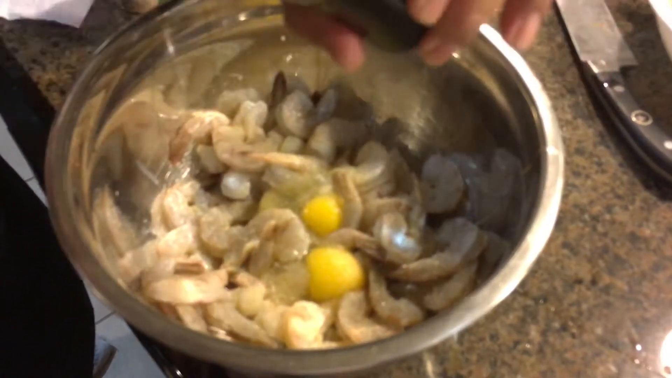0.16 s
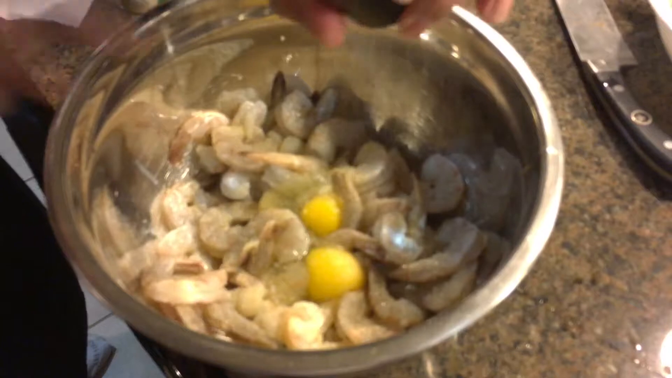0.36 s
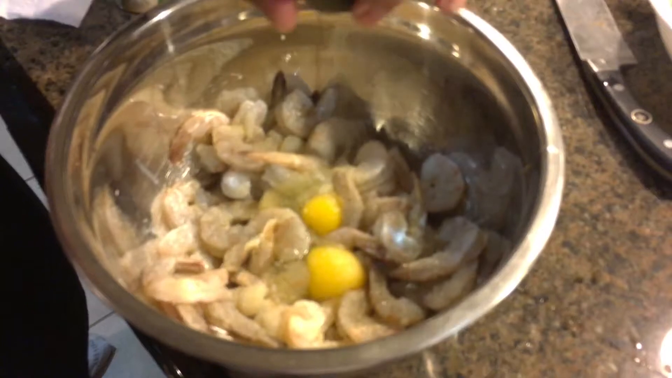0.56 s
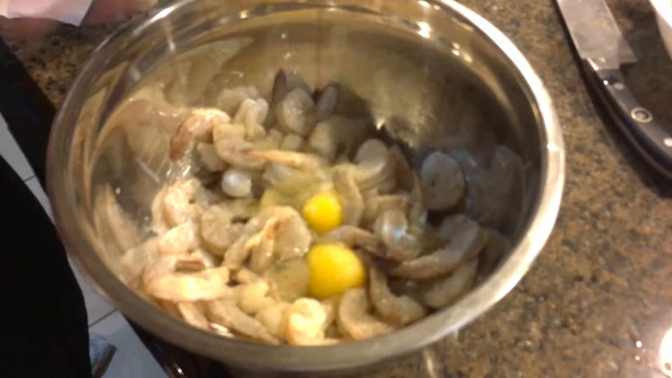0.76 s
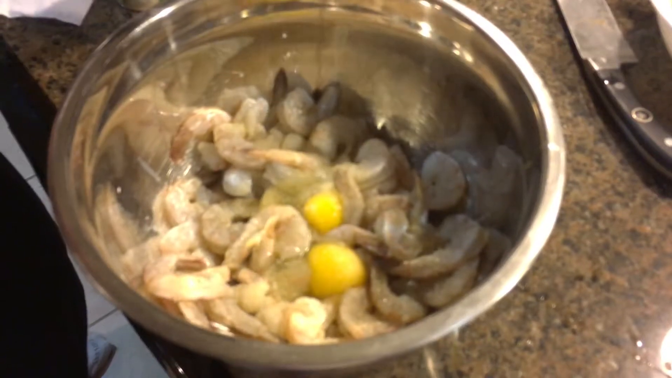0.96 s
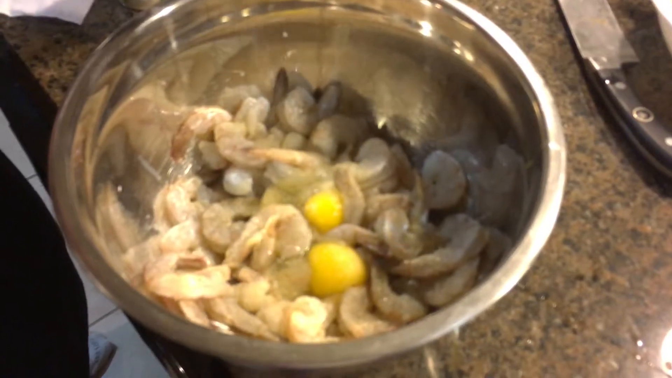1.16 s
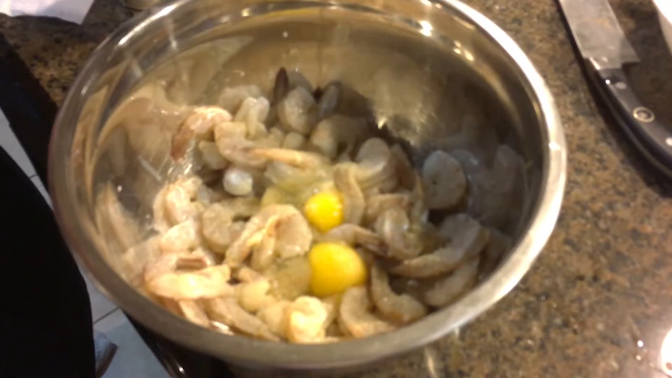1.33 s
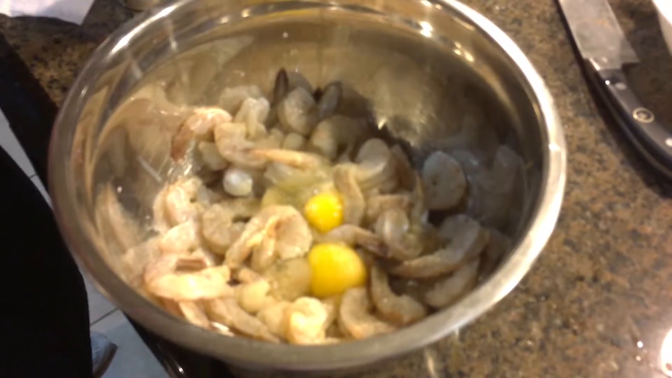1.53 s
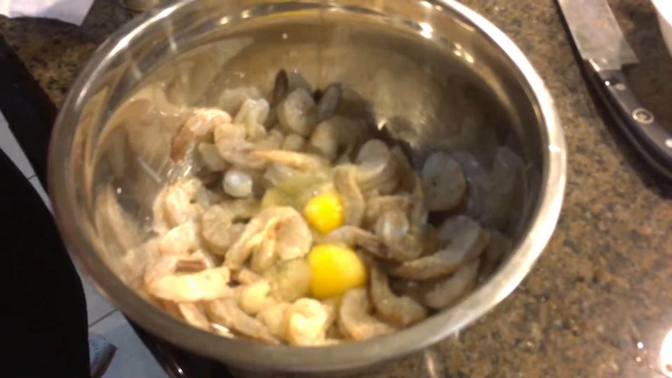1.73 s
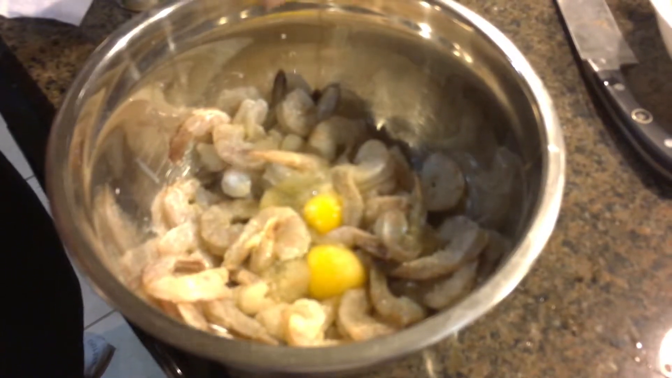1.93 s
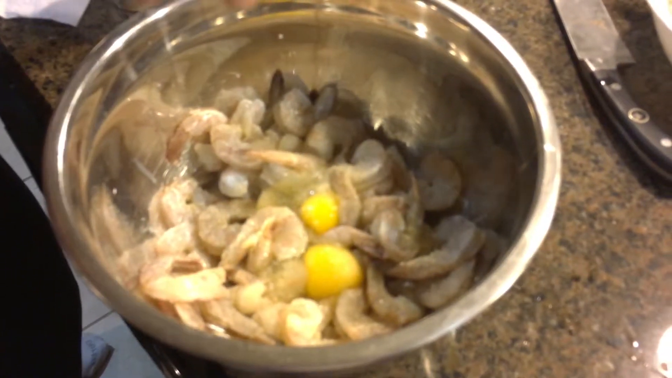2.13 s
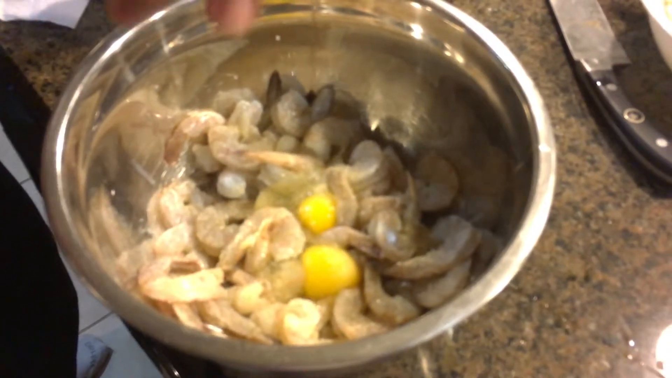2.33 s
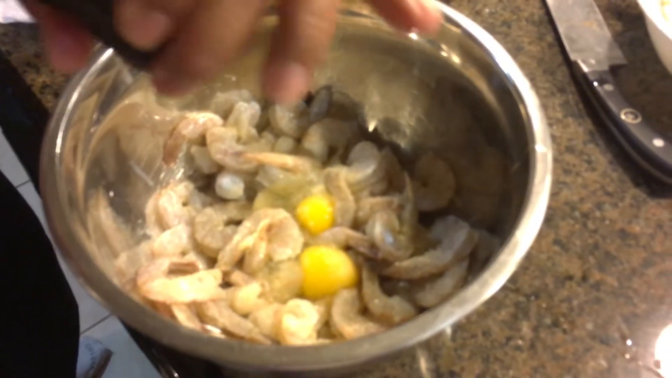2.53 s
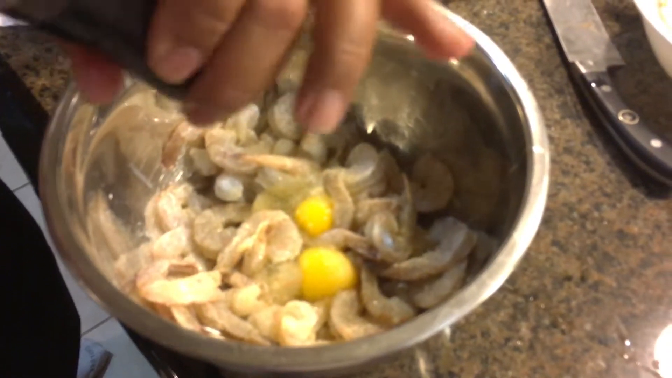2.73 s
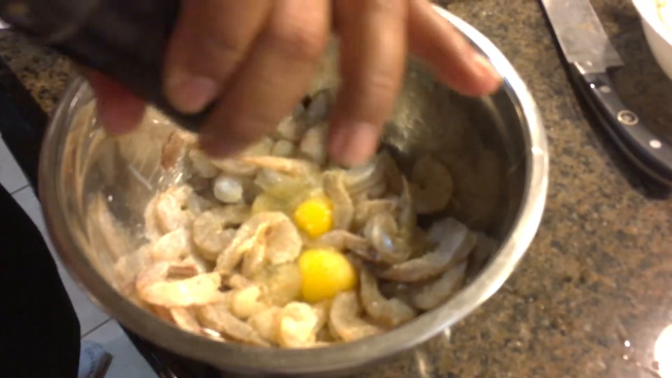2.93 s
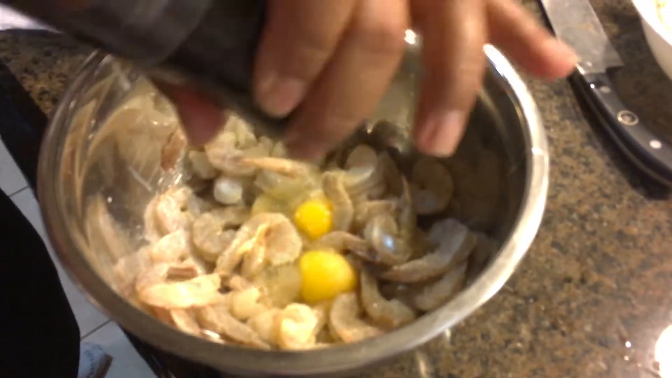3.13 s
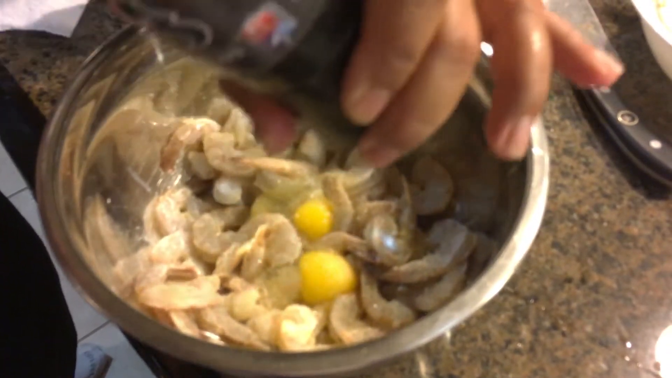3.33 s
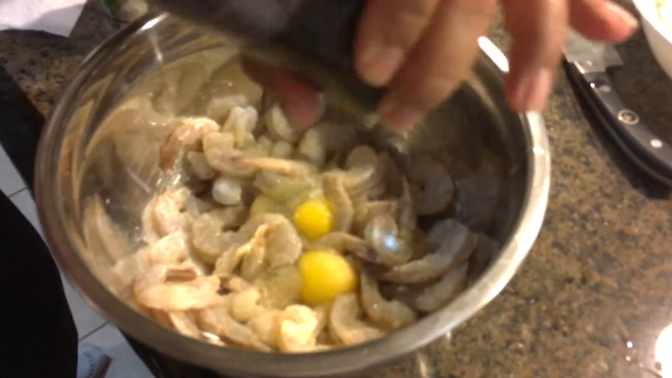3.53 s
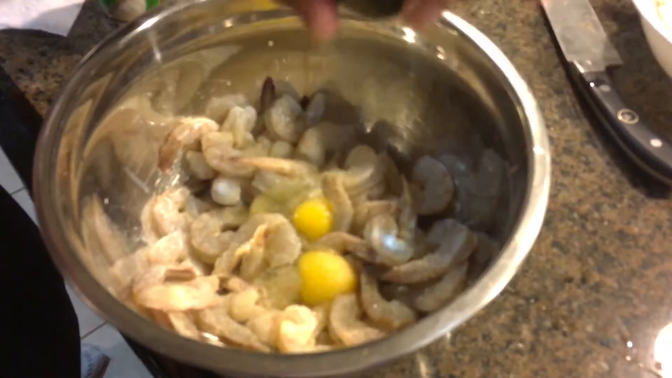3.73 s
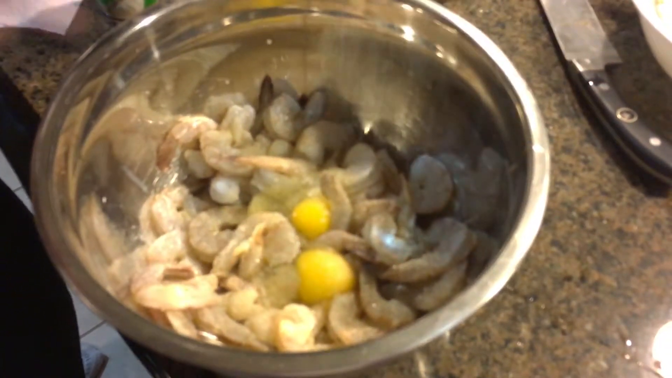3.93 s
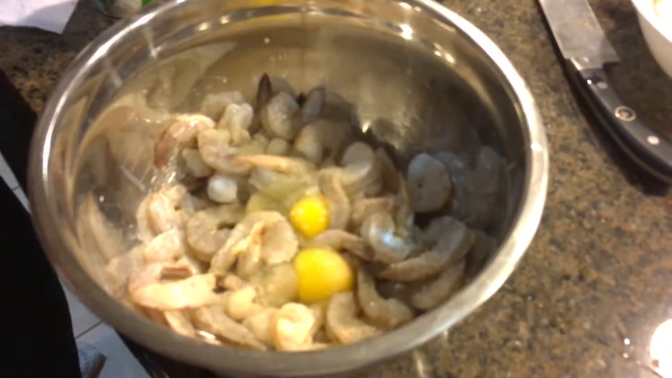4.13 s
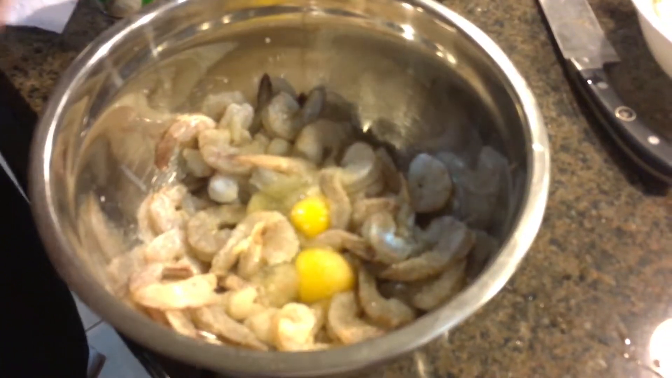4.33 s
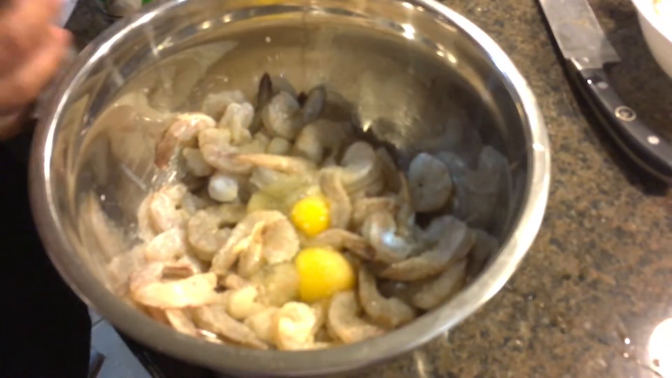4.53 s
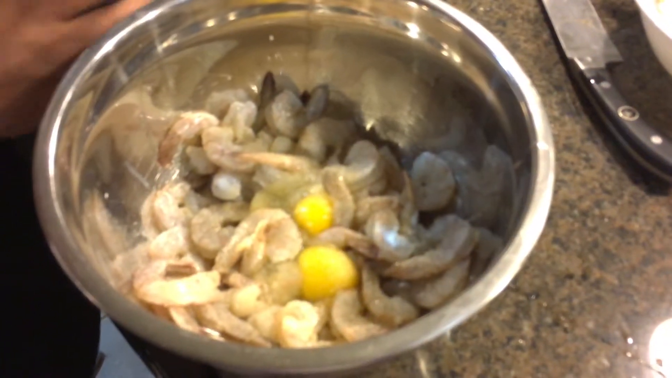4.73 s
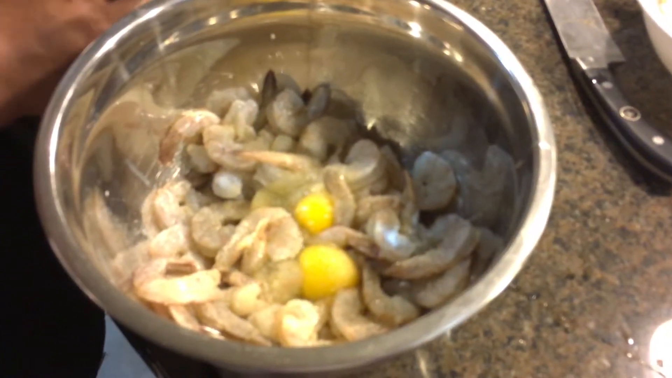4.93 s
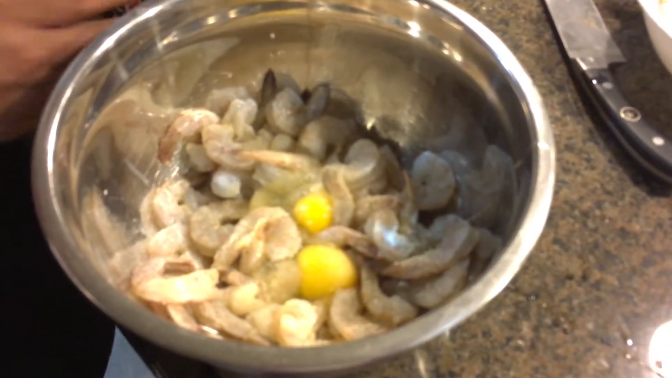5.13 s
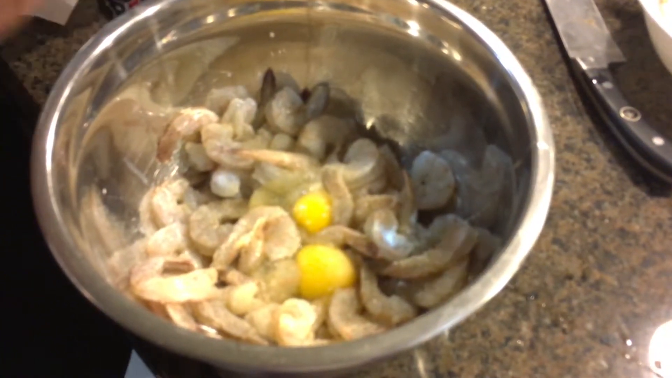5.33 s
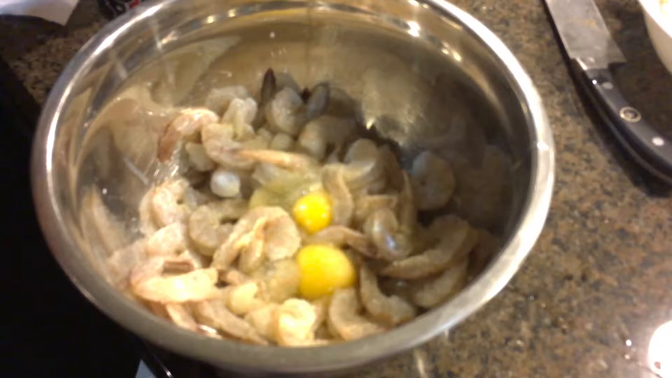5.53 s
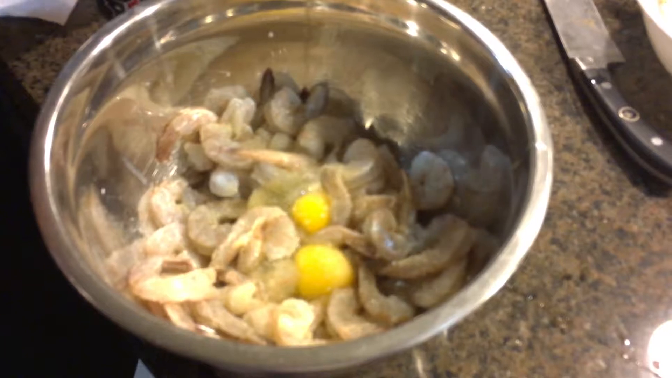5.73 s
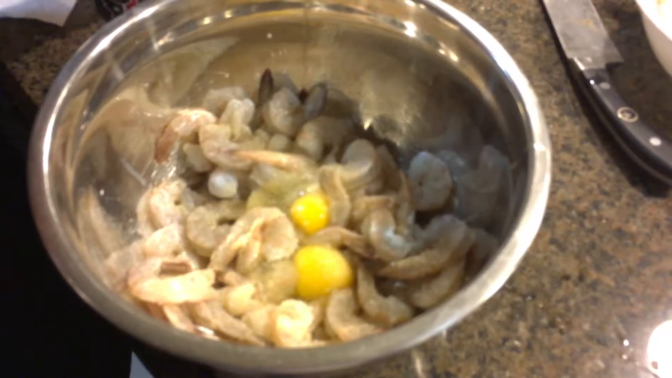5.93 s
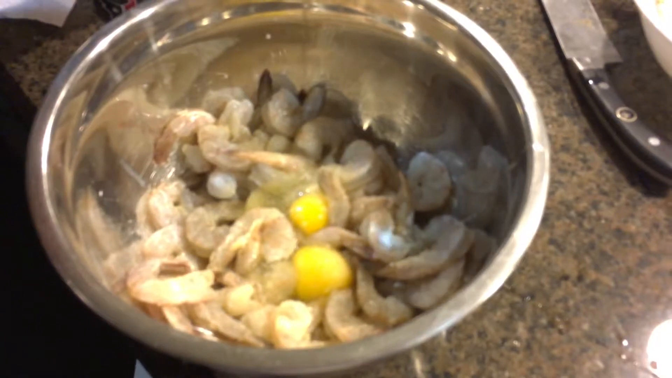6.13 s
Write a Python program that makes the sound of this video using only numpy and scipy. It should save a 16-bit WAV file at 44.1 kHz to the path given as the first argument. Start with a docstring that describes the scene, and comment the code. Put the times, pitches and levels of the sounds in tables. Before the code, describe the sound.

Close by in a home kitchen, a hand-twisted salt grinder makes about a dozen short, crisp crunches over a steel bowl, roughly three a second, with fine salt trickling and ticking between turns. The grinding stops, salt slides inside the mill with a soft hiss, and the mill clacks and rocks to rest on a stone counter a little farther away. A faint appliance hum continues underneath.

```python
"""A home kitchen: a hand-twisted salt mill makes a run of short turns over a steel bowl.
Each turn takes up its slack with a soft thump, then crushes crystals that ring the housing and,
faintly, the bowl. Salt trickles and ticks; the hand regrips with a squeak.
The mill is tipped upright, its salt slides back, and it rocks to rest on the stone counter.
An appliance hums; a faint background hiss drops out briefly near the end."""
import sys
import numpy as np
from scipy import signal
from scipy.fft import rfft, irfft, next_fast_len
from scipy.io import wavfile
from scipy.ndimage import map_coordinates

SR = 44100
rng = np.random.default_rng(int(sys.argv[2]) if len(sys.argv) > 2 else 0)


def to_wav(sig):
    """Store sig (one row per channel, or 1-D mono) as 16-bit WAV at the path in sys.argv[1].

    Samples outside -1..1 are clipped; the rate is SR.
    """
    pcm = np.clip(np.atleast_2d(sig), -1, 1) * 32767
    pcm = np.round(pcm).astype(np.int16)
    wavfile.write(sys.argv[1], SR, pcm.T)  # frames by channels


N = 272538

# Wrist turns. Each row: start in seconds, length in seconds, crunch level in dB, rise after the bite
# in dB, sag to the end in dB, shell and burr seat ring in dB relative to the crunch,
# slack before the bite in seconds, thump level in dB.
TURNS = [ (-0.1, 0.12, -27, 5, 9.9, -2.5, -6, 0.015, -33),
         (0.263, 0.092, -21.5, 8.7, 8.1, -1.5, -3, 0.043, -42),
         (0.602, 0.1, -23, 12, 2.2, -2, -3.5, 0.021, -36.5),
         (0.965, 0.12, -23, 8.3, 8.8, -0.5, -4, 0.011, -34.5),
         (1.327, 0.097, -20.5, 7.3, 9.9, -1, -2.5, 0.014, -35.5),
         (1.696, 0.103, -24.5, 1.7, 8.1, 2, -4.5, 0.018, -38),
         (2.051, 0.098, -24, 4.7, 1.4, -1.5, -4, 0.012, -31),
         (2.402, 0.11, -24.5, 7.7, 7.2, 2.5, -1.5, 0.012, -34),
         (2.763, 0.093, -22.5, 2, 11, -1, -4.5, 0.03, -34.5),
         (3.099, 0.11, -22.5, 5.5, 5.6, 0, -3.5, 0.013, -33),
         (3.46, 0.073, -19.5, 3.7, 8.8, 0, -4, 0.031, -30.5),
         (3.78, 0.1, -22.5, 2.8, 4.6, -2, -6, 0.037, -37.5)]
# Spectrum of breaking salt. Each row: frequency in Hz, relative gain in dB.
CRUNCH_SPECTRUM = [(150, -16), (400, -9), (700, -10.5), (1100, -8.5), (3000, -11.5), (4300, -4.5),
                   (4900, -8.5), (6000, -1), (6800, -6), (7700, -7), (8700, -2), (9900, -3.5),
                   (10500, -4.5), (11800, 0.5), (15800, -2.5)]
# Housing modes, shell (low) and burr seat (high). Each row: frequency in Hz, width in Hz, gain in dB.
SHELL_MODES = [(1030, 360, -21), (1517, 170, -1.5), (1706, 192, -1.5), (1844, 227, -4)]
SEAT_MODES = [(2236, 223, -1.5), (2420, 124, 3.5), (2760, 430, -3), (3426, 210, -3.5), (3900, 220, -13.5)]
SPIKE_DB = -12.5  # first instant of a break, relative to its spray


def grinding():
    """Crystals crumble and chip between the burrs, heard directly and through the housing."""
    crumble = amp(-1) * grains(per_s=760, spread_db=0, t60_s=0.016)
    chips = amp(12.5) * scattered_blows(per_s=80, spread_db=4.5)
    spray = crumble + amp(11) * (snaps(chips, t60_s=0.0086) + amp(SPIKE_DB) * chips)
    jolts = crumble + amp(6.5) * chips
    direct, housing = np.zeros((2, N))
    for start_s, length_s, db, rise_db, sag_db, shell_db, seat_db, _, _ in TURNS:
        force = amp(db) * twist_force(start_s, length_s, rise_db, sag_db)
        direct += amp(-1.23) * force * close_echoes(spray, echo_db=-14.5)
        housing += amp(shell_db - 3.5) * ringing(force * jolts, gripped(SHELL_MODES))
        housing += amp(seat_db - 2.5) * ringing(force * jolts, gripped(SEAT_MODES))
    return coloured(direct, CRUNCH_SPECTRUM) + housing


def twist_force(start_s, length_s, rise_db, sag_db):
    """One twist: the burrs bite, the force builds, holds, sags and lets go."""
    bite_s, attack_s, release_s = 0.0073, 0.035, 0.0091
    rub_db = -9.5  # burrs that only rub
    hold_end_s = max(0.55 * length_s, attack_s)
    times_s = start_s + np.array([-bite_s, 0, attack_s, hold_end_s, length_s, length_s + release_s])
    return envelope(times_s, [rub_db - rise_db, -rise_db, 0, 0, -sag_db, rub_db - sag_db])


def gripped(modes, detune=0.024, spread_db=1.5):
    """Each grip shifts the pitch and level of every housing mode a little."""
    draws = rng.standard_normal((len(modes), 2))
    return [(hz * (1 + detune * sharper), width_hz, db + spread_db * louder)
            for (hz, width_hz, db), (sharper, louder) in zip(modes, draws)]


def close_echoes(x, echo_db, count=6):
    """Hands and bowl add echoes at random delays of 0.5 to 3.3 ms."""
    delays = rng.integers(SR // 2000, SR // 300, count)
    response = np.bincount(delays, amp(echo_db) * rng.choice([-1, 1], count))
    response[0] = 1
    return convolved(x, response)


# Big breaks. Each row: time in seconds, level in dB, shell and burr seat ring offsets in dB.
CRACKS = [(0.2532, -12, -15, -9), (0.2643, -14, -25, -1.5), (0.3008, -3, -10, -18),
          (0.3245, 3.5, -16.5, -38), (0.3356, 0, -12.5, -8.5), (0.6017, -5.5, -14.5, -13),
          (0.6497, -4, -12, -8), (0.6845, 0, -12.5, -25), (0.9656, -4.5, -15.5, -16),
          (0.9845, -8, -5.5, -2), (1.08, -10, -8.5, -4), (1.366, -6, -10, -17), (1.3872, -6, -8, -5.5),
          (1.4069, -1.5, -19, -10), (1.6975, -1, -13, -16), (1.7143, -3, -15, -17), (1.7483, -3.5, -14, -7),
          (2.0521, -4, -15, -25), (2.0647, 1, -21, -28), (2.08, -6, -7, -30), (2.149, -12, -24, -19),
          (2.393, -15, -10, -9.5), (2.441, -3, -7.5, -5.5), (2.4741, -2, -30, -12), (2.5075, -6, -22, -25),
          (2.7619, -11.5, -10, 0), (2.8204, -15, -17, -18), (2.8522, -7, -14, -23), (2.8723, -11, -14, -22),
          (3.1323, -14.5, 2, 4.5), (3.178, -4.5, -11, -16), (3.215, -2, -20, -25), (3.4653, -7.5, 2, -9),
          (3.5007, 2.5, -12, -27), (3.778, -6.5, -10, -31), (3.7864, -4, -7.5, -2.5),
          (3.8013, -4, -11, -33), (3.84, -7, -20, -0.5), (3.8824, 0.5, -30, -19)]


def cracks():
    """A big crystal snaps, and its jolt strikes the housing as one blow."""
    direct, shell, seat = np.zeros((3, N))
    for at_s, db, shell_db, seat_db in CRACKS:
        snap = burst(t60_s=0.012)
        snap[0] += amp(SPIKE_DB)
        add(direct, at_s, amp(db + 2.5) * snap)
        add(shell, at_s, amp([db + shell_db + 13.5]))
        add(seat, at_s, amp([db + seat_db + 7.5]))
    return coloured(direct, CRUNCH_SPECTRUM) + ringing(shell, SHELL_MODES) + ringing(seat, SEAT_MODES)


# Spectrum of a dull push. Each row: frequency in Hz, relative gain in dB.
THUMP_SPECTRUM = [(20, -40), (35, -22), (60, 0.5), (140, -5), (250, -9.5), (500, -35), (1500, -49)]


def slack_thumps(gap_s=0.01506):
    """The wrist takes up the slack before each turn: a dull push, then a weaker one."""
    pushes = np.zeros(N)
    for start_s, *_, slack_s, db in TURNS:
        add(pushes, start_s - slack_s, amp([db + 24.5]))
        add(pushes, start_s - slack_s + gap_s, amp([db + 15]))
    return coloured(pushes, THUMP_SPECTRUM)


# Scrape before landing. Each row: time in seconds, level in dB.
SCRAPE_LEVELS = [(4.595, -64), (4.638, -47.5), (4.718, -56.5), (4.74, -62)]
# Base contacts. Each row: time in seconds, level in dB, ring, thud and clack offsets in dB.
KNOCKS = [(4.751, -32.5, -16, -2.5, -15), (4.801, -12.5, -11, -22, -14.5), (4.82, -9, -11.5, -34, -19.5),
          (4.83, -25.5, -11, -6, -9), (4.856, -22, -13, -13, -6), (4.858, -17.5, -15, -7, -20),
          (4.912, -24.5, -14, -2, -9)]
# Spectrum of a contact. Each row: frequency in Hz, relative gain in dB.
CLACK_SPECTRUM = [(500, -20), (1500, 3.5), (2200, -7), (3400, -1.5), (4300, -4.5), (5200, -11),
                  (9000, -11.5), (15800, -10)]
# Modes of the base-struck housing and the counter. Each row: frequency in Hz, width in Hz, gain in dB.
BASE_MODES = [(1533, 85, 13), (1810, 110, 2), (2440, 41, -3), (3240, 130, -8), (3590, 110, -10)]
COUNTER_MODES = [(202, 150, 1), (380, 170, 0), (525, 78, 1), (1020, 43, -7)]


def set_down():
    """The mill scrapes, then rocks: each contact clacks, rings the housing and thuds in the counter."""
    friction = envelope(*np.transpose(SCRAPE_LEVELS)) * grains(per_s=1700, spread_db=0, t60_s=0.006)
    scrape = ringing(friction, [(1930, 340, 0), (2350, 300, -2)])
    clack, ring, thud, weight = np.zeros((4, N))
    for at_s, db, ring_db, thud_db, clack_db in KNOCKS:
        add(clack, at_s, amp(db + clack_db + 21.5) * burst(t60_s=0.024))
        add(ring, at_s + 0.000985, amp([db + ring_db + 20.5]))
        add(thud, at_s + 0.0023, amp([db + thud_db + 20]))
    add(weight, 4.812, amp([-5]))  # full weight arrives just after first contact
    contacts = coloured(clack, CLACK_SPECTRUM) + ringing(ring, BASE_MODES) + ringing(thud, COUNTER_MODES)
    return scrape + contacts + coloured(weight, THUMP_SPECTRUM)


# Three hiss curves. First two: salt shifts as the mill is righted, then lowered. Last: salt settles,
# then a faint background hiss drops out near 5.3 s and returns near 5.6 s.
# Each row: time in seconds, level in dB.
CLOSING_HISS_LEVELS = [
    [(3.93, -62), (3.946, -58), (4.1, -51.5), (4.112, -48), (4.206, -64.5), (4.364, -42), (4.44, -51.5)],
    [(4.452, -44), (4.5, -33.5), (4.52, -33.5), (4.598, -45), (4.642, -41), (4.7, -49), (4.79, -49.5)],
    [(4.93, -64), (4.97, -49.5), (5.276, -66.5), (5.282, -79), (5.562, -76), (5.598, -64.5), (6.15, -71)],
]
# Spectrum of the hiss. Each row: frequency in Hz, relative gain in dB.
HISS_SPECTRUM = [(1200, -15), (2500, -10), (3600, -8.5), (4900, -8), (6000, -2.5), (7700, -4.5),
                 (9200, 2.5), (10400, -2.5), (13000, 4.5), (15800, -4.5)]
REGRIP_DELAY_S = 0.115  # after the end of a turn


def salt_and_background_hiss():
    """Fine salt is stirred, trickles and is shaken at each turn, then tipped; background hiss follows."""
    stir_s, stir_db = 0.036, -42.5
    trickle_db, fall_db_per_s = -41.5, 198
    shake_half_s, shake_db = 0.33, -60.5
    power = sum((amp(-1.24) * envelope(*np.transpose(curve))) ** 2 for curve in CLOSING_HISS_LEVELS)
    for start_s, length_s, *_ in TURNS:
        end_s = start_s + length_s
        flow = envelope([start_s - stir_s, start_s, end_s, end_s + 1],
                        [stir_db - 16, stir_db, trickle_db, trickle_db - fall_db_per_s])
        shake_times_s = end_s + REGRIP_DELAY_S + shake_half_s * np.array([-1, 0, 1])
        shake = envelope(shake_times_s, [shake_db - 8, shake_db, shake_db - 8])
        power += flow ** 2 + shake ** 2
    hiss = amp(1.5) * np.sqrt(power) * grains(per_s=1100, spread_db=7, t60_s=0.031)
    return coloured(hiss, HISS_SPECTRUM)


# Loudest loose grains. Each row: time in seconds, level in dB.
TICKS = [(0.3953, -24), (0.479, -27.5), (1.168, -25.5), (1.1985, -29), (1.6546, -23), (2.2884, -28.5),
         (3.6483, -36), (4.417, -28), (4.9638, -27), (4.9906, -23), (5.084, -29), (5.1454, -32)]
# Spectrum of one grain. Each row: frequency in Hz, relative gain in dB.
TICK_SPECTRUM = [(1500, -34), (4000, -11), (7000, -1), (9500, 1.5), (14000, 3), (15800, 7)]


def salt_ticks():
    """Single grains tick: a few loud ones, and faint strays while the mill is worked."""
    last_start_s, last_length_s, *_ = TURNS[-1]
    working = np.arange(N) / SR < last_start_s + last_length_s + REGRIP_DELAY_S
    drops = amp(-39) * scattered_blows(per_s=20, spread_db=3) * working
    for at_s, db in TICKS:
        add(drops, at_s, amp([db]))
    return coloured(amp(13) * snaps(drops, t60_s=0.009), TICK_SPECTRUM)


# Sliding salt. Each row: time in seconds, level in dB.
SLIDE_LEVELS = [(4.445, -44), (4.455, -45), (4.5, -41), (4.56, -64)]
# Salt chamber modes. Each row: frequency in Hz, width in Hz, gain in dB.
CHAMBER_MODES = [(1580, 47, 1.5), (1623, 40, -4), (2500, 85, -10), (5850, 130, -11)]


def salt_slide():
    """As the mill is righted, its load slides down the wall and rings the chamber."""
    sliding = envelope(*np.transpose(SLIDE_LEVELS)) * grains(per_s=1900, spread_db=5, t60_s=0.005)
    return ringing(sliding, CHAMBER_MODES)


# Rotor hitting its stop. Each row: time in seconds, level in dB.
CLICKS = [(0.223, -32.5), (3.4265, -31), (3.7448, -35)]


def rotor_clicks():
    """Small plastic clicks as the rotor changes direction."""
    taps = np.zeros(N)
    for at_s, db in CLICKS:
        add(taps, at_s, amp([db + 13]))
    return ringing(taps, [(2770, 200, -9), (4520, 300, -1.5), (4970, 500, -6)])


def grip_squeaks(centre_hz=6950, jitter_hz=900, squeak_s=0.03, scatter_s=0.012, db=-57, spread_db=3):
    """The shifting grip gives a short narrow-band chirp after every turn but the first."""
    track = np.zeros(N)
    t = np.arange(int(squeak_s * SR)) / SR
    knots_s = np.linspace(0, squeak_s, 48)
    for start_s, length_s, *_ in TURNS[1:]:
        later, louder = rng.standard_normal(2)
        pitch_hz = centre_hz + jitter_hz * np.interp(t, knots_s, rng.standard_normal(len(knots_s)))
        chirp = np.sin(np.pi * t / squeak_s) * np.sin(2 * np.pi * np.cumsum(pitch_hz) / SR)
        at_s = start_s + length_s + REGRIP_DELAY_S + scatter_s * later
        add(track, at_s, amp(db + spread_db * louder) * chirp)
    return track


# Steel bowl mode clusters. Each row: frequency in Hz, width in Hz, gain in dB.
BOWL_MODES = [(1515, 130, 0), (2510, 130, -7)]


def bowl(crunch):
    """The bowl faintly picks up the grinding and holds it in clusters of close modes."""
    held = convolved(crunch, burst(t60_s=0.55, size=SR // 2))
    return amp(-37) * ringing(held, BOWL_MODES)


# Kitchen decay. Each row: frequency in Hz, T60 in seconds.
KITCHEN_T60 = [(150, 0.45), (1500, 0.34), (5000, 0.37), (15000, 0.16)]


def kitchen_reverb(x, onset_s=0.00067):
    """Nearby walls answer; the treble dies first."""
    hz, t, noise = signal.stft(rng.standard_normal(SR * 2 // 3), SR, nperseg=256)
    decay = amp(-60 * t / at_hz(KITCHEN_T60, hz)[:, None])
    tail = signal.istft(noise * decay, SR, nperseg=256)[1]
    onset = 1 - np.exp(-np.arange(len(tail)) / SR / onset_s)
    return convolved(x, tail * onset)


# Hum partials. Each row: frequency in Hz, level in dB.
HUM_PARTIALS = [(119.5, -51), (204, -60.5), (351, -62.5)]


def appliance_hum():
    """Three low tones, each slightly unsteady in level and phase."""
    t = np.arange(N) / SR
    hum = np.zeros(N)
    for hz, db in HUM_PARTIALS:
        gain = amp(db - 1 + 0.7 * wobble(knots_per_s=4.18))
        hum += gain * np.sin(2 * np.pi * hz * t + 0.11 * wobble(knots_per_s=2.46))
    return hum


# Spectrum of the room's air. Each row: frequency in Hz, relative gain in dB.
AIR_SPECTRUM = [(18, -39), (32, -19), (62, -8), (110, -7.5), (180, -6.5), (260, -11), (430, -21),
                (650, -17.5), (830, -24), (1050, -20), (2300, -24.5), (3000, -33), (5000, -38),
                (15800, -45.5)]


def room_air():
    """Steady air noise, mostly bass."""
    return amp(-49.5) * unit_rms(coloured(rng.standard_normal(N), AIR_SPECTRUM))


def burst(t60_s, size=2048):
    """Decaying noise, energy 1."""
    spray = rng.standard_normal(size) * amp(-60 * np.arange(size) / SR / t60_s)
    return spray / np.linalg.norm(spray)


def grains(per_s, spread_db, t60_s):
    """A stream of tiny noise bursts at uneven intervals, rms 1."""
    starts = np.cumsum(rng.gamma(2, SR / per_s / 2, size=N // 8)).astype(int)
    starts = starts[starts < N]
    sizes = amp(spread_db * rng.uniform(-1, 1, len(starts)))
    blows = np.sqrt(np.bincount(starts, sizes ** 2, N))
    return unit_rms(snaps(blows, t60_s))


def scattered_blows(per_s, spread_db, count=600):
    """Impulses of uneven size at uneven intervals."""
    starts = np.cumsum(rng.gamma(2, SR / per_s / 2, size=count)).astype(int)
    sizes = amp(spread_db * rng.uniform(-1, 1, count))
    return np.bincount(starts, sizes, N)[:N]


def snaps(blows, t60_s):
    """Each blow becomes a short spray of noise of the same energy."""
    pole = amp(-120 / (t60_s * SR))
    power = signal.lfilter([1 - pole], [1, -pole], blows ** 2)
    return np.sqrt(power) * rng.standard_normal(N)


def ringing(x, modes, size=8192):
    """x through resonances of alternating sign, each (frequency in Hz, width in Hz, relative dB)."""
    f = np.fft.rfftfreq(size, 1 / SR)
    response = sum((-1) ** k * amp(db) * 1j * f * width_hz / (hz * hz - f * f + 1j * f * width_hz)
                   for k, (hz, width_hz, db) in enumerate(modes))
    return convolved(x, irfft(response))


def coloured(x, spectrum, size=8192):
    """x through a minimum-phase filter with the given spectral shape."""
    gain = amp(at_hz(spectrum, np.fft.rfftfreq(size, 1 / SR)))
    cepstrum = irfft(np.log(gain))
    cepstrum[1:size // 2] *= 2
    cepstrum[size // 2 + 1:] = 0
    return convolved(x, irfft(np.exp(rfft(cepstrum))))


def convolved(x, response):
    """Convolve with the response scaled to energy 1."""
    return signal.fftconvolve(x, response / np.linalg.norm(response))[:N]


def envelope(times_s, db):
    """A dB curve as gain per sample, silent outside its span."""
    return amp(np.interp(np.arange(N) / SR, times_s, db, left=-200, right=-200))


def wobble(knots_per_s):
    """A smooth random curve."""
    knots = rng.standard_normal(int(N * knots_per_s / SR) + 4)
    return map_coordinates(knots, [np.arange(N) * knots_per_s / SR])


def at_hz(points, hz):
    """Read (Hz, value) points on a log frequency axis."""
    points_hz, values = np.transpose(points)
    return np.interp(np.log(hz + 1), np.log(points_hz + 1), values)


def add(track, at_s, sound):
    """Mix a sound in; skip it if it starts before zero."""
    if at_s >= 0:
        span = track[round(at_s * SR):][:len(sound)]
        span += sound[:len(span)]


def amp(db):
    """Decibels to gain."""
    return 10 ** (np.asarray(db) / 20)


def unit_rms(x):
    """Scale to rms 1."""
    return x / np.sqrt(np.mean(x ** 2) + 1e-20)


def scene():
    """The mill is worked close by and put down farther away, with the kitchen around it."""
    crunch = grinding() + cracks()
    near = crunch + bowl(crunch) + slack_thumps()
    near += salt_and_background_hiss() + salt_ticks() + salt_slide()
    near += grip_squeaks() + rotor_clicks()
    far = set_down()
    reverb = kitchen_reverb(amp(-17) * near + amp(-9.5) * far)
    return (near + amp(-1.5) * far + reverb + appliance_hum() + room_air())[None]


def record(dry):
    """Brick-wall low-pass."""
    cutoff_hz = 15850
    size = next_fast_len(N + SR // 2)
    passband = np.fft.rfftfreq(size, 1 / SR) < cutoff_hz
    return irfft(rfft(dry, size) * passband, size)[..., :N]


dry = scene()
out = record(dry)
to_wav(out)
```